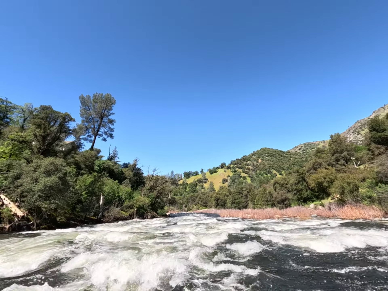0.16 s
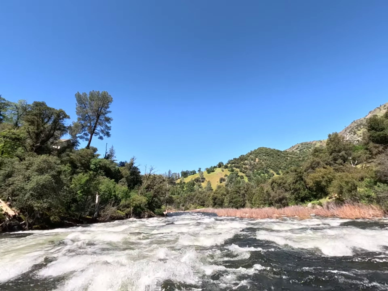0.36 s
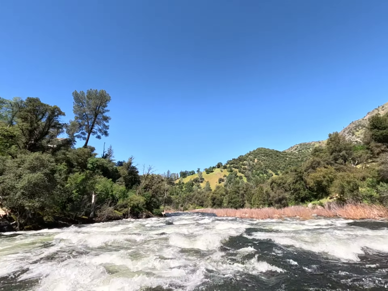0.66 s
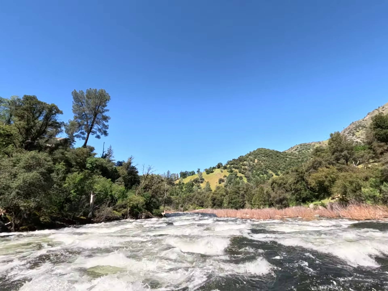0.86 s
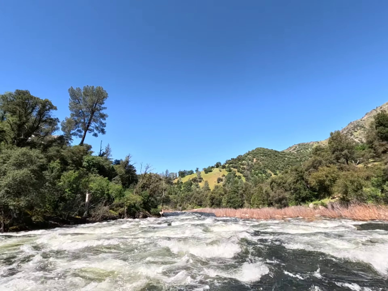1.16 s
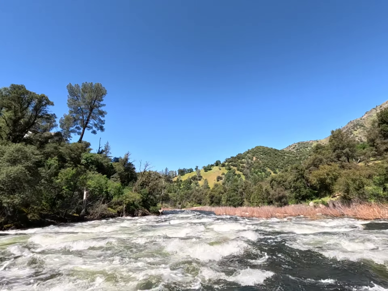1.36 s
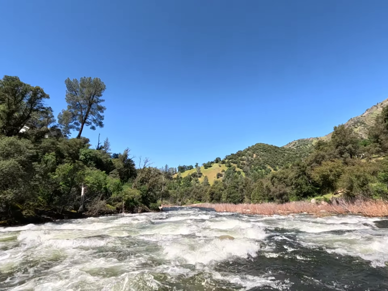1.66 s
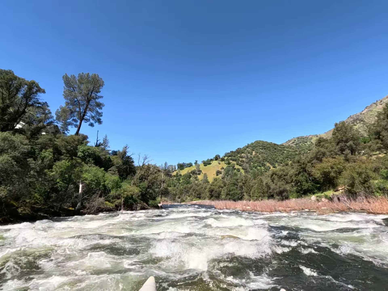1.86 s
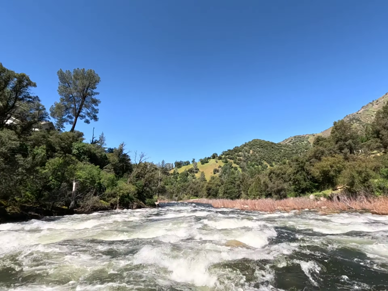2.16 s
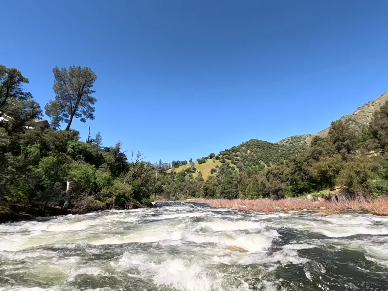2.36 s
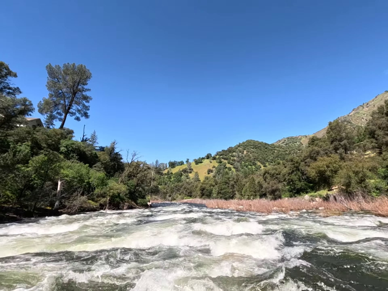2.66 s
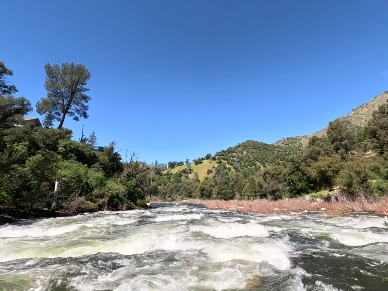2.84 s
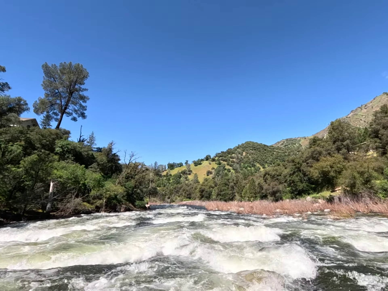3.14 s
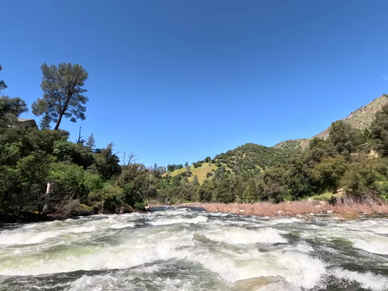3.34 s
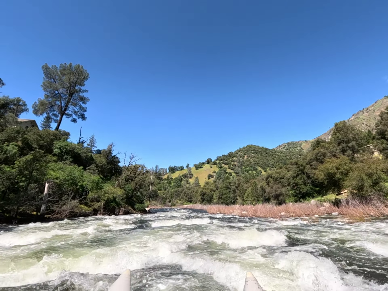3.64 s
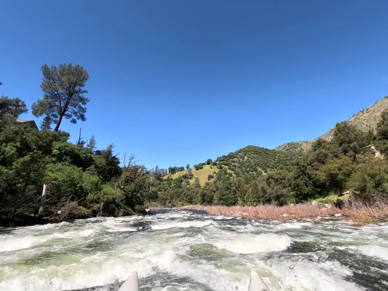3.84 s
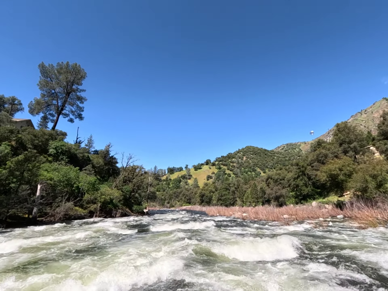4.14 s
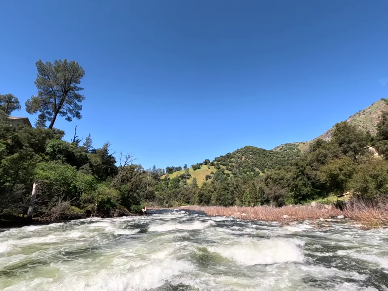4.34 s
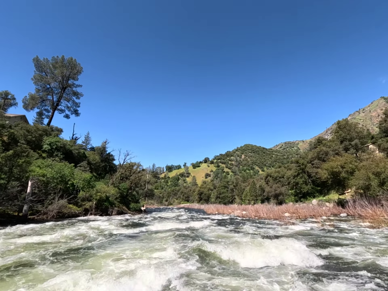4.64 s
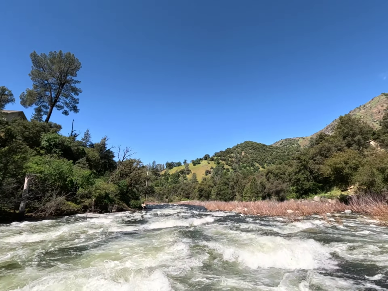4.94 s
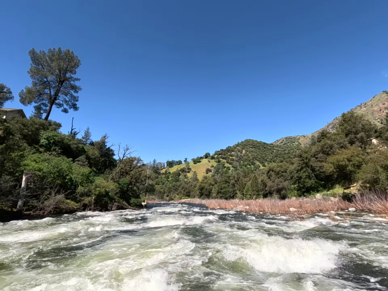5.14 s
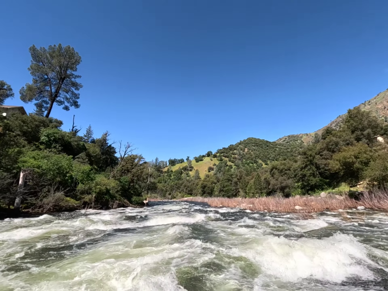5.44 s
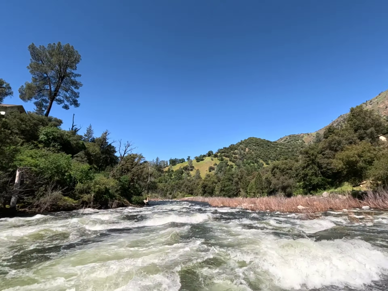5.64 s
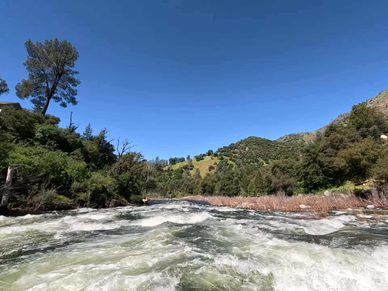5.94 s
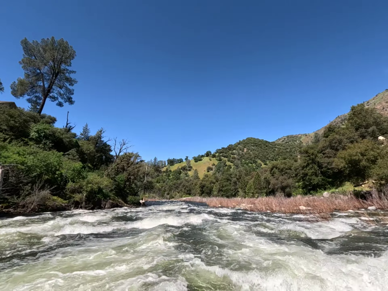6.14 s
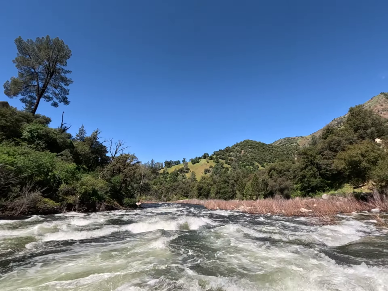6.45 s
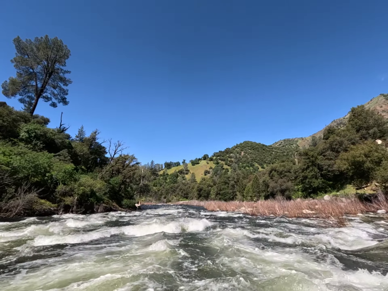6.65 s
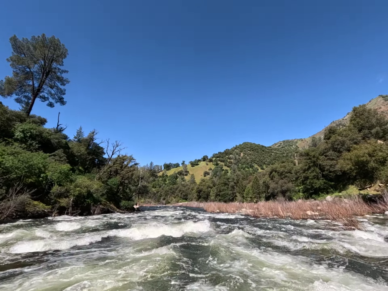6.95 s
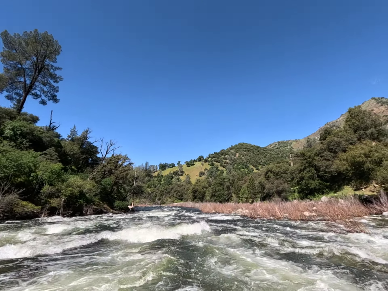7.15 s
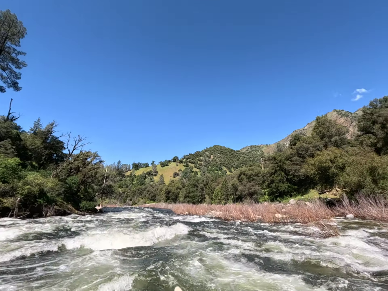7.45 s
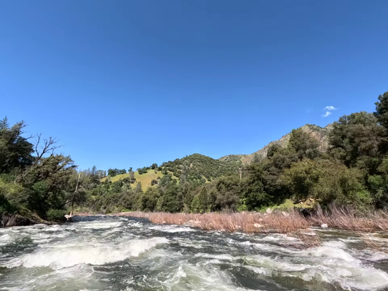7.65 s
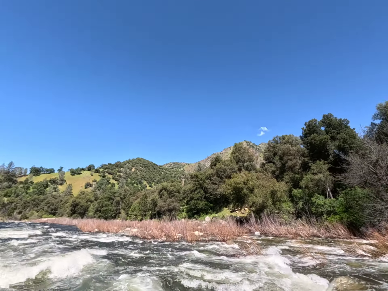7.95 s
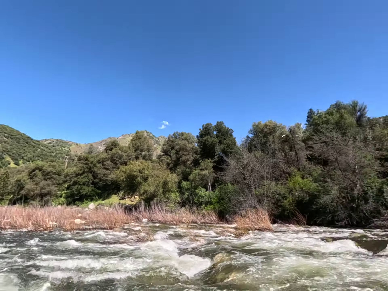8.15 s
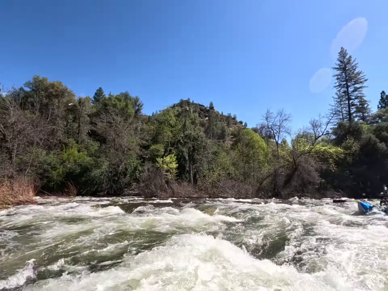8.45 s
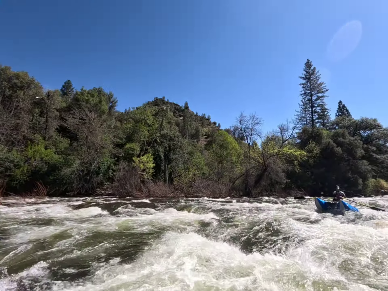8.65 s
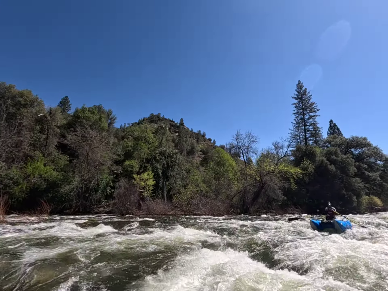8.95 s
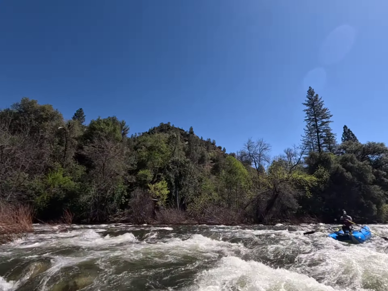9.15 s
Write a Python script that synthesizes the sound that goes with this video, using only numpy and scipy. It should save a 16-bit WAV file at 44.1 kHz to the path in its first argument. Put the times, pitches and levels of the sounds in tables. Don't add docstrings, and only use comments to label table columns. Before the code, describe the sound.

For about nine seconds, river rapids roar continuously around a small boat, heard close through a sealed housing. Foam is dense, grainy and muffled, with a hollow midrange ring above deep, tumbling current; little treble passes. Low wind gusts buffet and flutter irregularly, strong near 1, 3, 6.3 and 8.5 s. A soft hull knock comes at 0.9, a harder one at 1.8, a deep one at 4.3. Very short, hollow wave slaps hit at 2.0, a pair near 2.7, then 3.1, 3.7, 4.7, 5.5, 5.8, three from 6.2 to 6.6, and 7.6. The low roar deepens around 5 s; breaking water peaks near 2 and 6.2, easing after 7.5. Faint bubble fizz and tiny droplet flicks hide beneath. Fine, very high spray hiss is only on the right, brightest around 5.5 and fading late. Everything else is centred, without echo.

```python
import sys
import numpy as np
from scipy import signal
from scipy.fft import rfft, irfft
from scipy.io import wavfile

SR = 44100
rng = np.random.default_rng(int(sys.argv[2]) if len(sys.argv) > 2 else 0)


def to_wav(s):
    ch = np.atleast_2d(s).T
    pcm = np.round(np.clip(ch, -1, 1) * 32767)
    wavfile.write(sys.argv[1], SR, pcm.astype(np.int16))


def linear_from_db(decibels):
    return 10 ** (np.asarray(decibels, float) / 20)


N = 410130
TIME = np.arange(N) / SR


def rms_one(x):
    return x / np.sqrt(np.mean(x ** 2) + 1e-20)


def noise():
    return rng.standard_normal(N)


def in_time(rows):
    s, *columns = np.transpose(rows)
    return [np.interp(TIME, s, column) for column in columns]


def colour(x, spectrum):
    hz, db = np.transpose(spectrum)
    log_hz = np.log(np.fft.rfftfreq(N, 1 / SR) + 1)
    gain = linear_from_db(np.interp(log_hz, np.log(hz), db))
    return rms_one(irfft(rfft(x) * gain, N))


def resonate(x, hz, r, delay=0):
    return signal.lfilter([0] * delay + [1], [1, -2 * r * np.cos(2 * np.pi * hz / SR), r * r], x)


def drift(rate):
    step = 40
    r = np.exp(-2 * np.pi * rate * step / SR)
    points = rng.standard_normal(N // step + 2002)
    slow = signal.lfilter([1], [1, -2 * r, r * r], points)[2000:]
    return np.interp(np.arange(N) / step, np.arange(len(slow)), rms_one(slow))


def swell(s, length):
    half = length / 2
    return np.exp(-((TIME - s - half) / half) ** 4)


def surges(rows):
    t = np.arange(0, N / SR + .01, .01)
    s, half, *rises_db = np.transpose(rows)
    shape = np.exp(-((t[:, None] - s) / half) ** 2)
    return in_time(np.c_[t, shape @ np.transpose(rises_db)])


# (peak time [s], half length [s], buffeting rise [dB], flutter rise [dB])
WIND_GUSTS = [(.2, .15, 7.5, 4), (.47, .15, 11.5, 3.5), (.72, 0.14, 4, 5), (.98, 0.18, 15, 3.5),
              (1.35, .1, 7.5, -0.5), (1.8, 0.081, 5.5, 0), (2.168, .17, 9.5, 6.5), (2.7, 0.13, 11, 7),
              (3.073, 0.22, 12, 6), (3.6, .13, 2.5, 5), (4.284, .17, 7.5, 4.5), (4.9, 0.22, 3, 9),
              (5.35, .17, 8.5, 6), (5.7, .13, 1.5, 5), (5.981, 0.18, 10.5, 4.5), (6.298, .13, 14, 8),
              (6.65, .18, 8.5, 8.5), (7.0, .17, 7, 10), (7.43, 0.2, 8.5, 8.5), (7.82, 0.2, 5.5, 9.5),
              (8.201, .2, 11, 7.5), (8.521, .16, 13, 9), (9.057, 0.15, 9, 5.5)]


def gusts():
    buffet_rise, flutter_rise = surges(WIND_GUSTS)
    return -48 + buffet_rise, -52 + flutter_rise


# (frequency [Hz], level [dB per Hz])
HEAVE_SPECTRUM = [(1, -6), (3, 0), (8, -3), (16, -18), (100, -80), (1000, -130)]
# (frequency [Hz], level [dB per Hz])
BUFFET_SPECTRUM = [(8, -14.5), (16, -1), (28, -1.5), (42, -4), (60, -12.5), (90, -29.5), (200, -59.5),
                   (1000, -110)]
# (frequency [Hz], level [dB per Hz])
FLUTTER_SPECTRUM = [(25, -24), (55, 1.5), (110, -2.5), (170, -16.5), (500, -61), (2000, -110)]


def wind():
    buffet_db, flutter_db = gusts()
    buffet = colour(noise(), BUFFET_SPECTRUM) * linear_from_db(buffet_db + 1.5 * drift(12))
    flutter = colour(noise(), FLUTTER_SPECTRUM) * linear_from_db(flutter_db - 0.5 + 0.91 * drift(12))
    heave = colour(noise(), HEAVE_SPECTRUM) * linear_from_db(-43)
    return buffet + flutter + heave


# (time [s], level [dB], length [s])
TICK_BURSTS = [
    (.87, -97, .03),
    (1.99, -91, .025),
    (3.077, -86, .03),
    (6.415, -94, .025),
    (8.47, -97, .03),
]
# (frequency [Hz], level [dB per Hz])
TICK_SPECTRUM = [(1500, -31.5), (3000, -2), (6000, -1.5), (9500, -9), (11000, -40)]


def treble_ticks():
    tick_noise = colour(noise(), TICK_SPECTRUM)
    return tick_noise * sum(linear_from_db(db) * swell(s, length) for s, db, length in TICK_BURSTS)


# (peak time [s], half length [s], rise [dB])
FIZZING_CRESTS = [
    (.1, .3, 1),
    (1.75, .35, 2.5),
    (4.15, .4, 3),
    (6.0, .45, 2),
    (7.75, .5, 2.5),
]
# (frequency [Hz], level [dB per Hz])
FIZZ_SPECTRUM = [(1500, -29.5), (2600, 0.5), (3400, -2.5), (3900, -6), (4500, -3), (5100, -13), (6200, -20),
                 (7000, -39.5)]


def fizz(breaking, facing):
    fizz_db = -81 - .1 * breaking + .35 * facing + sum(surges(FIZZING_CRESTS))
    return colour(noise(), FIZZ_SPECTRUM) * linear_from_db(fizz_db - 0.5 + 0.89 * drift(6))


# (time [s], peak level [dB], pitch [Hz])
HULL_KNOCKS = [
    (1.758, -24, 126),
    (4.325, -32, 76),
    (.9, -31.5, 95),
]


def thumps():
    out = np.zeros(N)
    for s, db, hz in HULL_KNOCKS:
        turns = np.clip(TIME - s, 0, None) * hz
        push = turns * 4.3 * np.exp(-(turns / 0.45) ** 2)
        out += linear_from_db(db + 6.0) * np.sin(2 * np.pi * turns) * push
    return out


# (time [s], peak level [dB], length [s], ring [Hz])
WAVE_SLAPS = [(1.995, -15.5, 0.01, 888), (2.647, -18.5, 0.0097, 926), (2.709, -16.5, 0.012, 970),
              (3.082, -18, 0.013, 949), (3.701, -23.5, 0.0086, 910), (4.748, -15.5, 0.013, 952),
              (5.477, -19, 0.012, 948), (5.76, -17.5, 0.011, 902), (6.192, -17, 0.015, 795),
              (6.425, -16, 0.011, 962), (6.607, -17, 0.011, 947), (7.567, -16.5, 0.0091, 939)]


def slaps():
    out = np.zeros(N)
    for s, db, length, hz in WAVE_SLAPS:
        out += linear_from_db(db - 4.0) * swell(s, length) * np.sin(2 * np.pi * hz * TIME)
    return out


# (frequency [Hz], level [dB per Hz])
SPRAY_SPECTRUM = [(2000, -60), (2600, -29.5), (4900, -45), (6500, -38.5), (7300, -39), (7700, -54.5),
                  (8600, -42.5), (9200, -55), (10300, -49.5), (10700, -28.5), (11300, -12.5), (11900, -1.5),
                  (12300, 0), (15500, -14.5)]


def spray(facing):
    born = rng.random(N) < 4000 / SR
    clicks = born * noise() * linear_from_db(2.5 * np.minimum(rng.exponential(1, N), 3))
    hiss = noise() + linear_from_db(-9.5) * rms_one(clicks)
    return colour(hiss, SPRAY_SPECTRUM) * linear_from_db(-60 + facing + 7.0 + .6 * drift(14))


# (middle time [s], half length [s], rise [dB])
MAIN_TROUGH = [
    (5.2, 2.2, 2.5),
]
# (frequency [Hz], level [dB per Hz])
ROAR_SPECTRUM = [(50, -29.5), (110, -5), (170, -3), (270, -1.5), (350, -7), (480, -9.5), (700, -18.5),
                 (1200, -51.5), (2500, -100)]


def roar(breaking, facing):
    roar_db = -41.5 + .5 * breaking + .15 * facing + sum(surges(MAIN_TROUGH))
    return colour(noise(), ROAR_SPECTRUM) * linear_from_db(roar_db + 0.48 + 0.88 * drift(15))


# (frequency [Hz], width [Hz])
CAVITY_MODES = [(921, 146), (1680, 125.5)]


def housing(x):
    for hz, width in CAVITY_MODES:
        x = resonate(x, hz, np.exp(-np.pi * width / SR))
    return rms_one(x)


def bubbles(per_s, spread_db, cycles):
    sizes = linear_from_db(spread_db * np.minimum(rng.exponential(1, N), 5)) * rng.choice([-1, 1], N)
    born = rng.random(N) < per_s * linear_from_db(2.0 * drift(7)) / SR
    pitch = rng.integers(0, 24, N)
    out = np.zeros(N)
    for k, hz in enumerate(np.geomspace(250, 7000, num=24)):
        r = linear_from_db(-60 * hz / cycles / SR)
        pinches = sizes * born * (pitch == k) + 1e-18
        out += rms_one(resonate(pinches, hz, r, delay=1)) * np.sqrt(hz)
    return rms_one(out)


# (frequency [Hz], level [dB per Hz])
FOAM_SPECTRUM = [(150, -25), (350, -3), (550, 2), (700, 1), (950, -0.5), (1300, -4), (1700, -8),
                 (2100, -11), (2600, -13.5), (3300, -30.5), (6500, -49)]


def foam(breaking):
    far = noise() * linear_from_db(.5 * drift(6.5))
    near = linear_from_db(-8.5) * bubbles(per_s=6000, spread_db=2.5, cycles=9.0)
    dip = sum(swell(s - .008, length + 0.0085) for s, db, length, hz in WAVE_SLAPS)
    return housing(colour(far + near, FOAM_SPECTRUM)) * linear_from_db(-30 + breaking - 3.4 * dip)


# (time [s], breaking [dB], facing [dB])
RAPID_RUN = [(0, -3, -0.5), (.4, -3.5, -2.5), (.9, -2.5, -2.5), (1.3, -1.5, -2), (1.75, -1, -1.3),
             (2.0, 1.2, -1.5), (2.25, -1, -2.5), (2.7, 0.5, -1.2), (3.2, -.6, -1.5), (3.7, -0.4, 0.7),
             (4.5, 0, -.5), (5.05, -1.5, 1), (5.45, 0, 2.1), (6.2, 1.15, 0), (6.8, 0.5, -0.4),
             (7.5, -0.9, -4), (8.5, -2.5, -5), (9.3, -2, -7)]


def scene():
    breaking, facing = in_time(RAPID_RUN)
    boat = wind() + treble_ticks() + thumps() + slaps()
    water = fizz(breaking, facing) + roar(breaking, facing) + foam(breaking)
    sealed = boat + water
    return np.array([sealed, sealed + spray(facing)])


def low_pass(x):
    return signal.sosfilt(signal.butter(12, 15430, fs=SR, output="sos"), x)


def record(dry):
    fade = np.sin(np.minimum(TIME / 0.0024, 1) * np.pi / 2) ** 2
    return low_pass(dry * fade)


dry = scene()
out = record(dry)
to_wav(out)
```